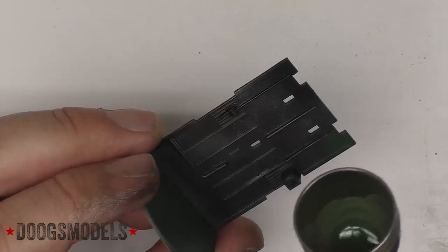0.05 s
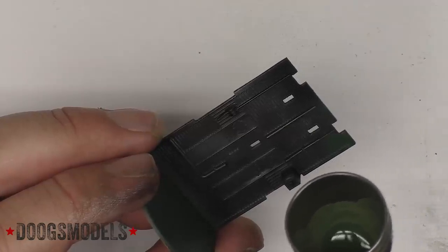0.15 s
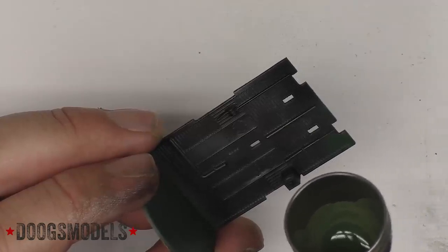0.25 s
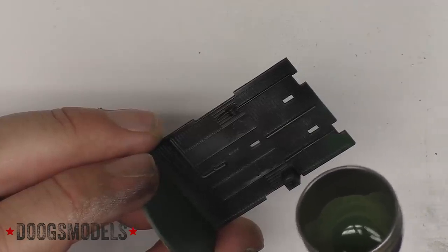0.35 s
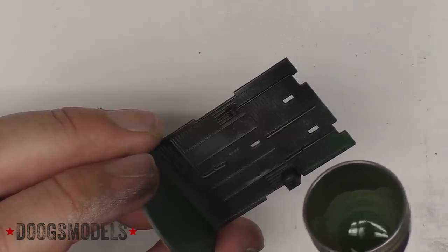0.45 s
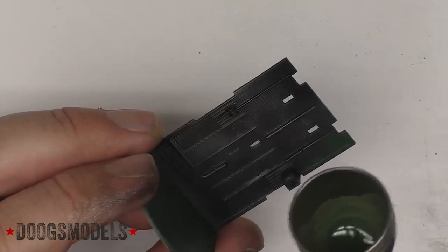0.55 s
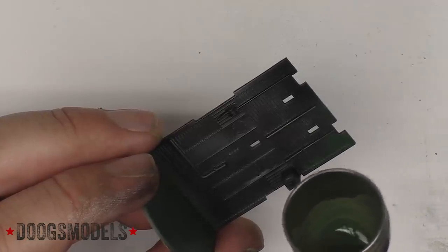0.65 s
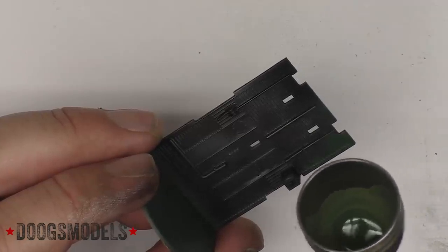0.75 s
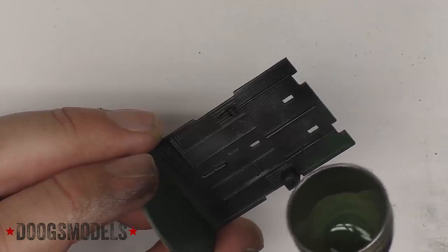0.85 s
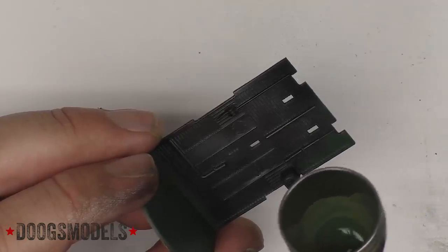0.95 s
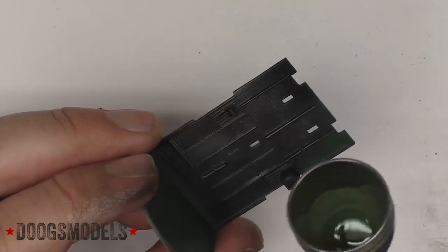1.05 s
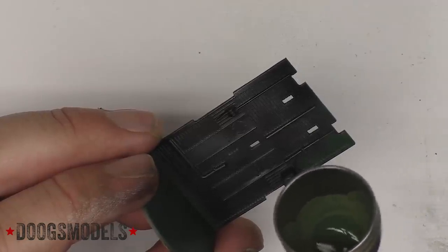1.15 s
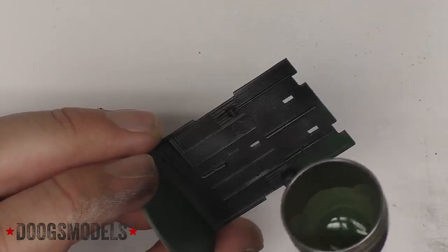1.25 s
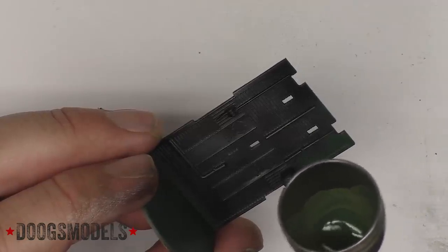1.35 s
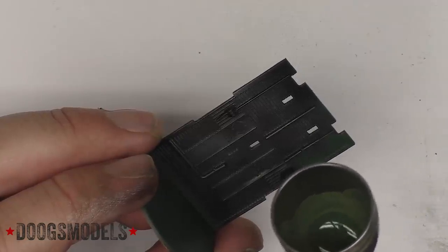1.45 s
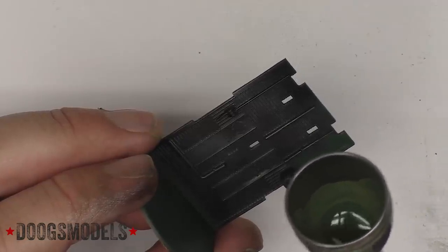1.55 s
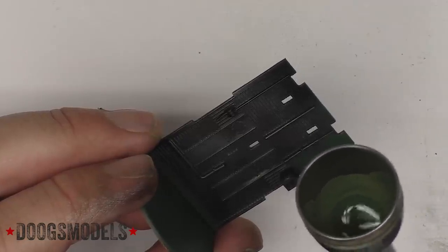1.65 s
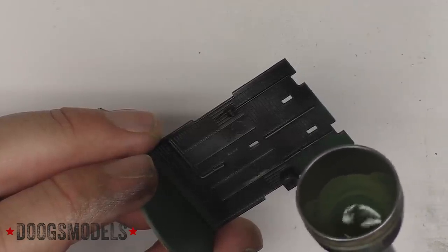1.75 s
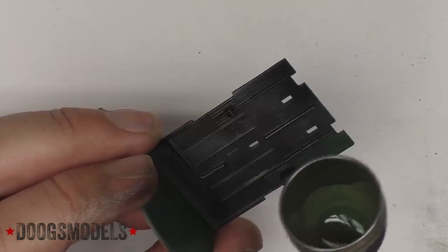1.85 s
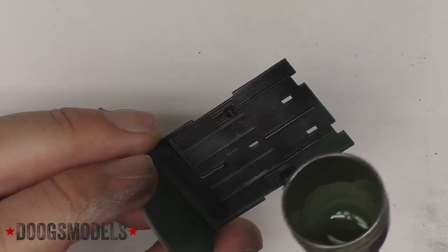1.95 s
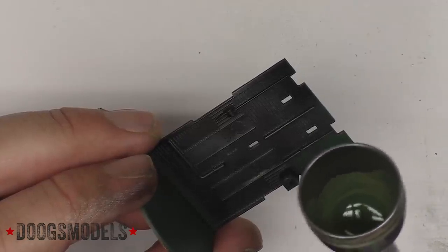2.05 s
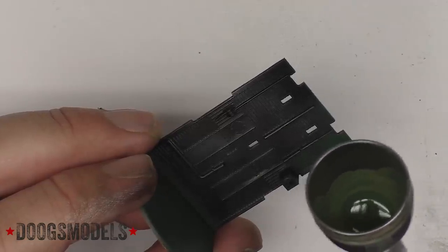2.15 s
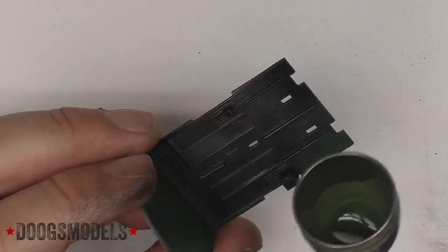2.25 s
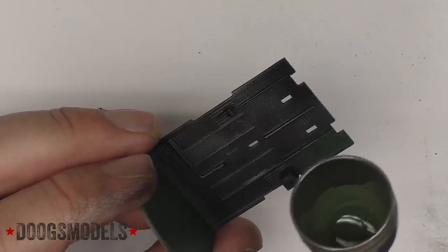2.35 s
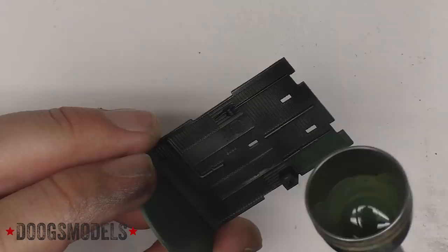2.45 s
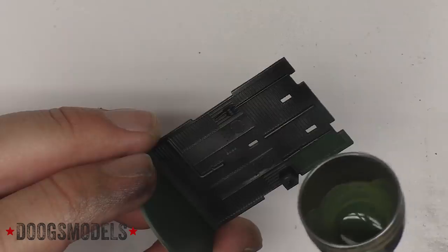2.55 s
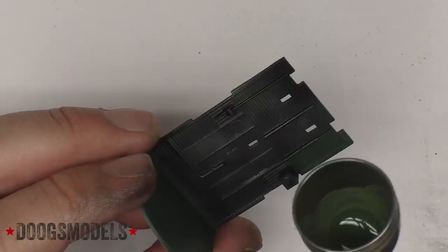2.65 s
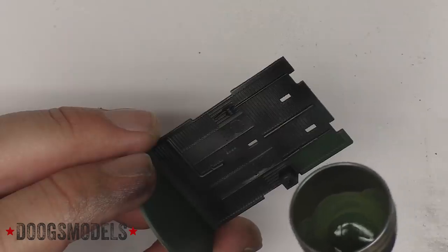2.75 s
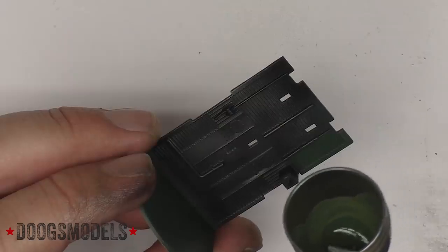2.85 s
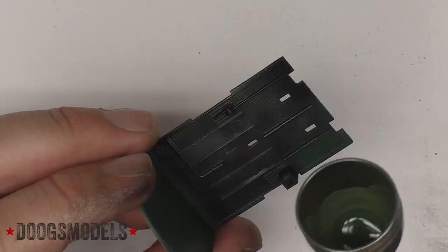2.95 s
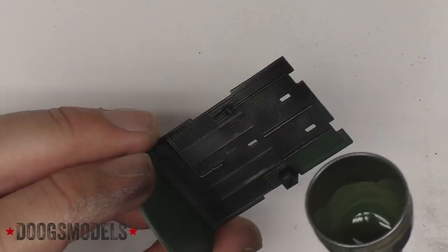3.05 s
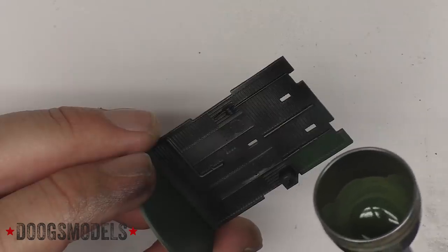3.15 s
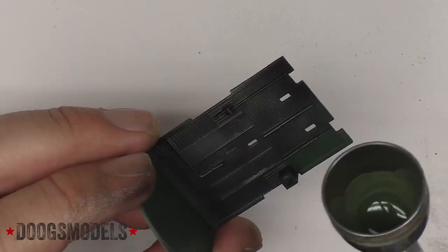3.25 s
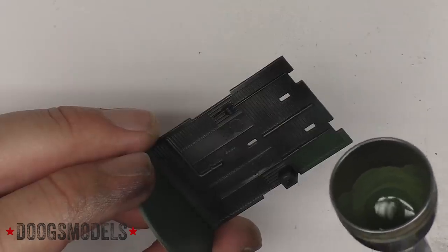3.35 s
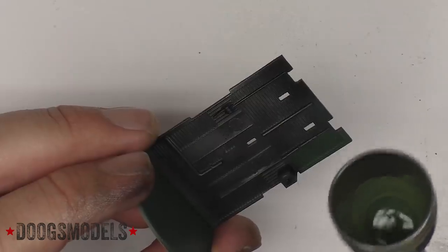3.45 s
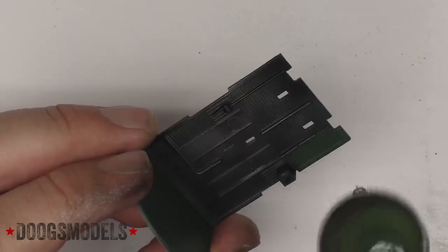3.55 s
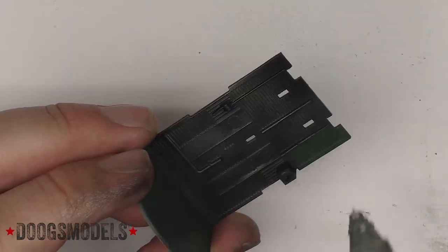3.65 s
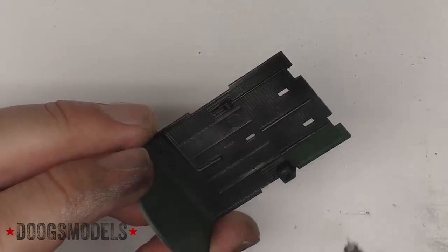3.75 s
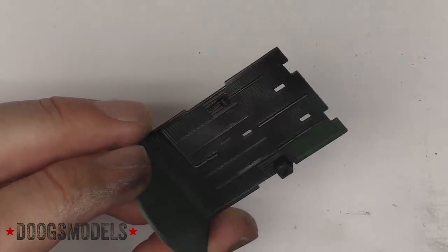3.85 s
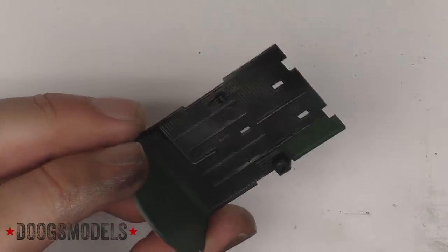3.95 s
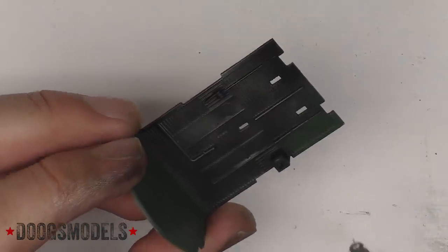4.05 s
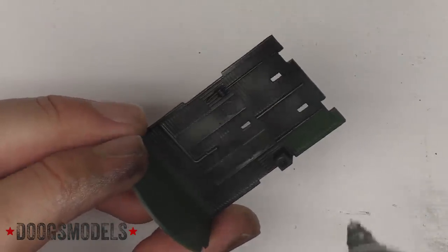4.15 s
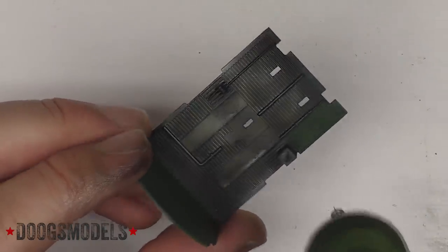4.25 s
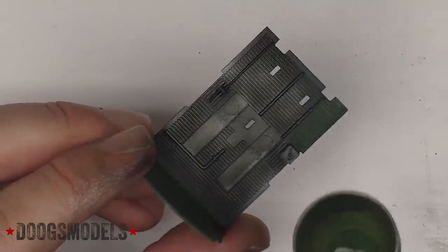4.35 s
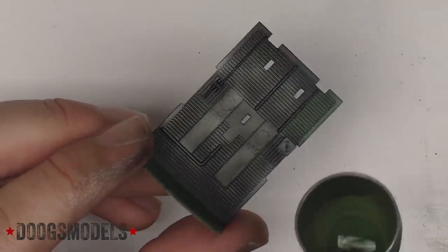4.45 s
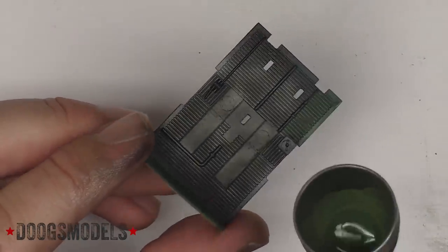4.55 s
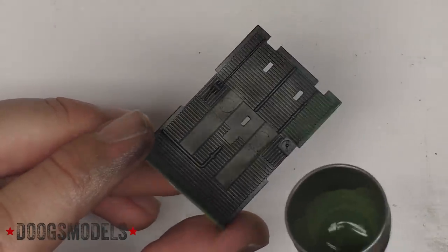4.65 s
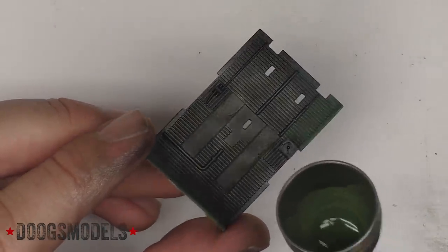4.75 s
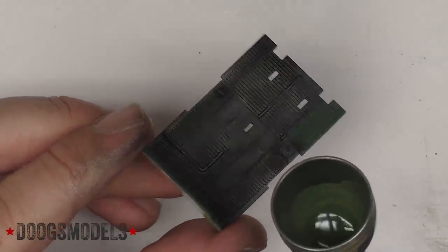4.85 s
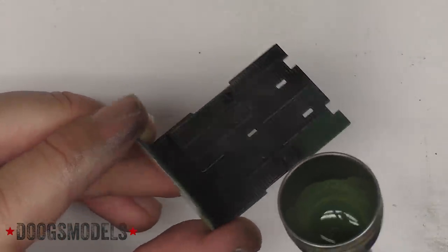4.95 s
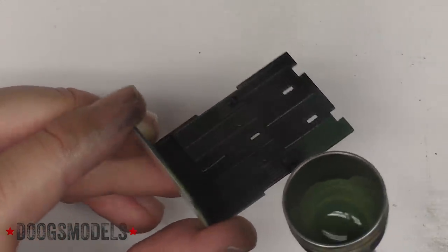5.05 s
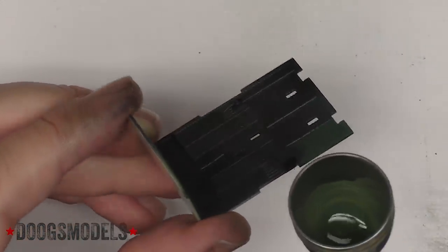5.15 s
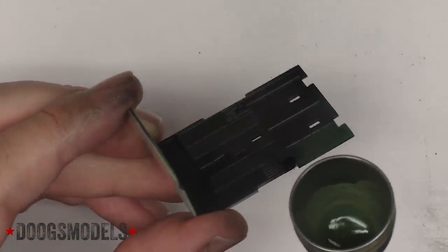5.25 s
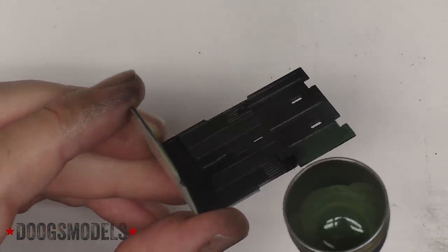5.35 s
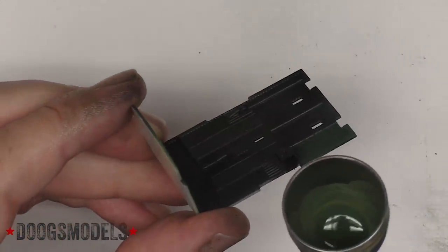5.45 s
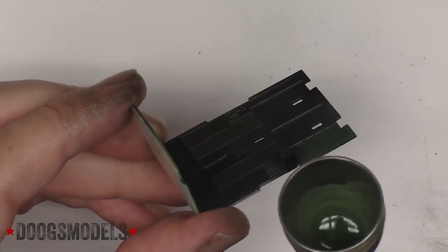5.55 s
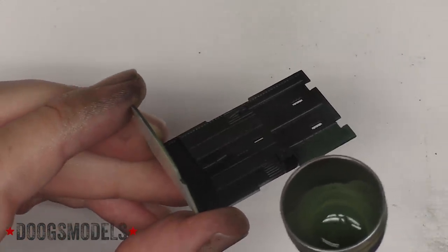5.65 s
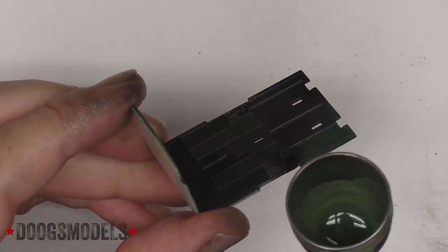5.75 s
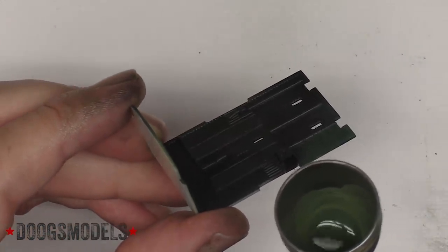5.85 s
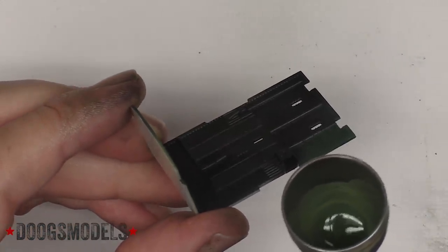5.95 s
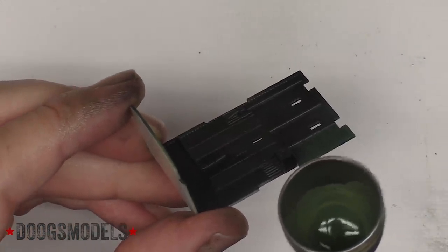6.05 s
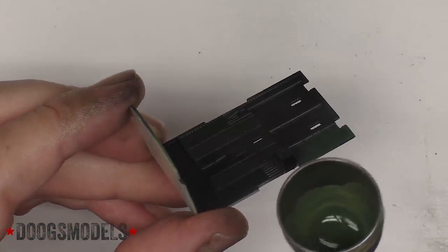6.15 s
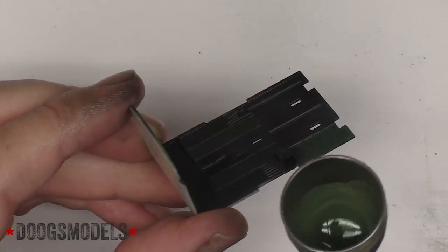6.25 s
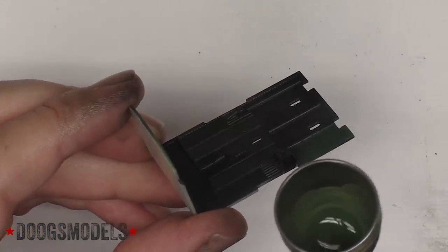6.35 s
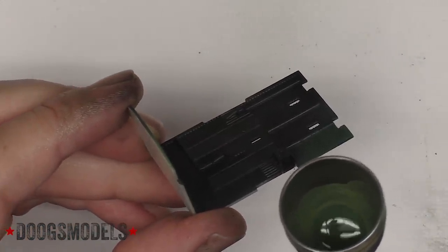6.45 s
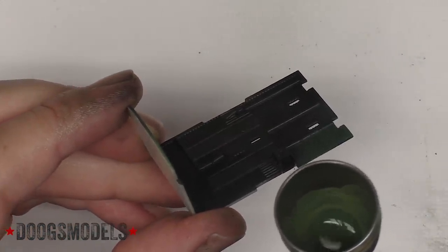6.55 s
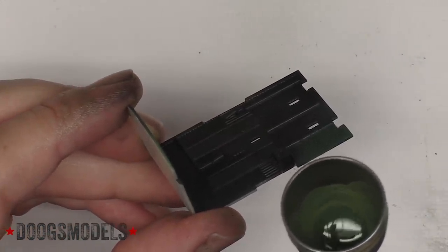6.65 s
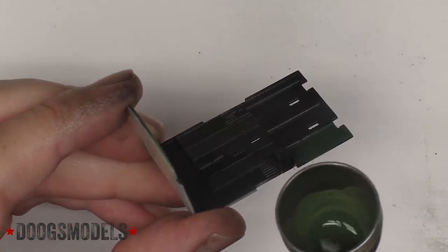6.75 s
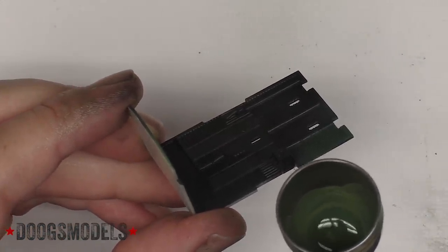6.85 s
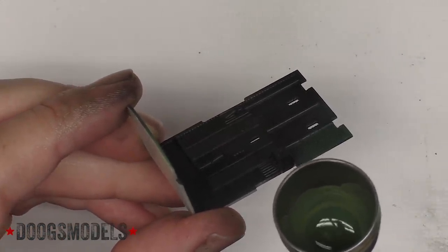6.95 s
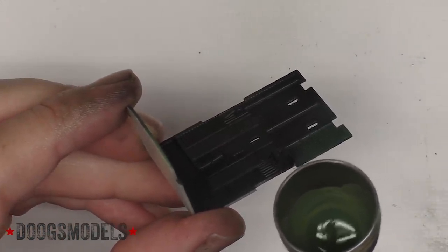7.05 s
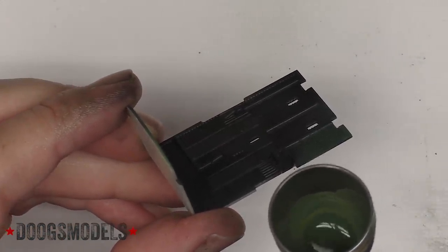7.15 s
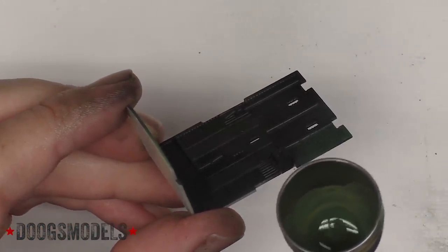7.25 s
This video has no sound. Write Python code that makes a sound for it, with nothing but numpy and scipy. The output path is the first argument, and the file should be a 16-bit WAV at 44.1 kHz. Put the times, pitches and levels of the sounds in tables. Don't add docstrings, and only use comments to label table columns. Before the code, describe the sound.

Close bright spray hiss, long then a tiny puff then long again, over a faint pump hum that briefly buzzes between strokes.

```python
import sys
import numpy as np
from scipy import signal
from scipy.fft import rfft, irfft, next_fast_len
from scipy.io import wavfile
from scipy.ndimage import uniform_filter1d, map_coordinates

SR = 44100
rng = np.random.default_rng(int(sys.argv[2]) if len(sys.argv) > 2 else 0)


def gain_from_decibels(decibels):
    exponent = np.asarray(decibels, float) / 20
    return 10 ** exponent


def unload_audio(sound):
    columns = np.transpose(np.atleast_2d(sound))
    steps = np.round(np.clip(columns, -1, 1) * 32767)
    wavfile.write(sys.argv[1], SR, steps.astype(np.int16))


N = 322371

# [opens/s, rise/s, shuts/s, fall t60/s, seep level/dB, seep t60/s]
TRIGGER = [
    (-1, .01, 3.528, .075, -22, 2.6),
    (4.654, .03, 4.82, .045, -18, .4),
    (5.582, .034, 9, .1, -30, 1),
]
FREE_DB = [-41.1, -37.2, -35.4]
# [f/Hz, density/dB per Hz]
JET_FLAT = [(350, -14.9), (1000, -16.3), (1900, -2.2), (2700, -10.6), (5400, -15.3), (9000, -11.7),
            (13000, -10.6), (15700, -19.4)]
# [f/Hz, density/dB per Hz]
JET_TURNING = [(350, -14.5), (1000, -6.6), (1900, 0.7), (2700, 1.6), (5400, -13.7), (9000, -13.6),
               (13000, -14.3), (15700, -17.4)]
# [f/Hz, density/dB per Hz]
JET_TILTED = [(350, -15.1), (1000, -19.2), (1900, -5.2), (2700, -12.1), (5400, -20.8), (9000, -10.2),
              (13000, -8.6), (15700, -19.7)]
# [f/Hz, width/Hz, level/dB]
HELD_FLAT = [(610.0, 190.0, -7.7), (990.0, 160.0, 7.7), (1350.0, 420.0, 5.6), (2130.0, 120.0, 4.6),
             (2390.0, 130.0, 6.7), (2590.0, 90.0, -5.5), (2840.0, 150.0, 14.0), (2860.0, 170.0, -13.5),
             (3600.0, 120.0, -4.1), (3890.0, 160.0, 8.3), (4300.0, 450, 8), (5120.0, 70.0, -5.9),
             (5640.0, 130.0, -4.0), (12270.0, 420.0, -3.7)]
# [f/Hz, width/Hz, level/dB]
HELD_TURNING = [(630.0, 350.0, -11.5), (2630.0, 220.0, -5.1), (3410.0, 900.0, -12.2), (4440.0, 880.0, 5.7),
                (7540.0, 700.0, -11.6), (7620.0, 420.0, 14.0), (8330.0, 260.0, 3.9), (11140.0, 900.0, 5.0),
                (15150.0, 190.0, -5.1)]
# [f/Hz, width/Hz, level/dB]
HELD_TILTED = [(710.0, 450.0, -14.0), (1940.0, 240.0, -7.0), (2380.0, 120.0, 5.6), (3030.0, 80.0, 5.2),
               (3920.0, 320.0, 9.8), (4380.0, 240, 15.5), (5100.0, 770.0, 14.0), (5120.0, 130.0, -10.2),
               (6480.0, 900.0, 7.4), (6920.0, 100.0, 7.4), (8350.0, 120.0, 6.1), (9390.0, 160.0, 5.2),
               (12280.0, 140.0, -6.5), (12860.0, 320.0, -6.8)]
# [t/s, length/s, flat level/dB, ridge level/dB]
CROSSINGS = [(-0.1, 0.26, 6.6, 1.8), (0.16, 0.22, 7.5, 0.4), (0.38, 0.14, 5.5, -0.8),
             (0.52, 0.09, 1.3, -1.6), (0.61, 0.18, 3.2, -1.5), (0.95, 0.08, 1.3, 0.2),
             (1.5, 0.18, 0.4, 1.5), (1.68, 0.21, 1.2, 8.1), (1.89, 0.21, 0.6, 2.0), (2.1, 0.13, 1.5, 7.8),
             (2.23, 0.1, 1.8, 3.5), (2.77, 0.1, 4.4, -0.6), (2.87, 0.13, 6.9, -0.2), (3, 0.15, 4.5, 1.1),
             (3.15, 0.2, 1.2, 3.1), (3.35, 0.2, -1.5, 5.7), (4.795, 0.05, -1.6, 4.3), (5.6, 0.17, 0.4, 0.4),
             (5.88, 0.08, 0.3, 1.5), (6.07, 0.04, -1.2, -2.2), (6.2, 0.25, 1, 0.8), (6.7, 0.08, 0.7, 2.0),
             (6.81, 0.09, 2.1, 1.5), (6.97, 0.07, -0.6, 1.2), (7.17, 0.11, 4.4, 2.4)]
# [t/s, level/dB]
NEEDLE = [(0, 2.8), (0.1, 2.4), (0.55, -0.0), (3.41, 0.0), (3.48, -4.3), (5.62, 0.2), (5.86, -3.8),
          (6.35, -2.3), (6.5, 1.0), (6.57, 3.1), (6.96, 3.3), (7.05, -1.4), (7.13, -0.6), (7.31, 1.6)]
# [f/Hz, share]
FLAT_SHARE = [(500, 0.26), (1800, 1.21), (2900, 1.14), (5500, 0.87), (6400, 0.24), (7800, 0.71),
              (9200, 0.24), (15700, -0.01)]
# [f/Hz, share]
RIDGE_SHARE = [(600, -0.01), (2400, 0.34), (3700, 1.25), (5200, 0.66), (6000, 1.26), (8000, 0.42),
               (9300, 0.75), (11000, 0.23)]
# [f/Hz, share]
PAINT_SHARE = [(1500, 0.0), (3500, 0.18), (7500, 0.6), (9000, 0.96), (12400, 1.14), (13000, 0.5),
               (14400, 1.68), (15700, 0.66)]
# [f/Hz, level/dB]
GLINT = [(3000, -40), (6000, -16), (9000, -9), (13000, -6), (16000, -5)]
# [f/Hz, level/dB]
SPREAD = [(600, -6), (1300, -20), (2000, -21), (2800, -12), (4500, -14), (7000, -23), (10800, -14),
          (15000, -10)]
# [f/Hz, t60/s]
BENCH = [(500, .4), (1200, .45), (3000, .55), (5000, .7), (12000, .4)]
# [t/s, level/dB]
LOAD = [(0, .5), (.6, -1.5), (1.7, -2), (2.9, .5), (3.52, -2), (3.62, -12), (4.13, -14), (4.2, -10),
        (4.4, -9), (4.5, -3.5), (4.75, 2), (5.3, .3), (5.5, -6), (5.58, -10), (5.68, 0), (7.31, 2)]
# [f/Hz, density/dB per Hz]
RUMBLE = [(20, -13), (108, 1), (160, -5), (230, -3), (430, -8), (560, -21), (900, -34), (1400, -70)]
# [f/Hz, width/Hz, level/dB]
HOUSING = [(1930, 95, 0), (2125, 110, -6)]
# [t/s, rise/s, level/dB]
BUZZ = (4.14, .02, -67.5)
# [f/Hz, level/dB]
WHINE = (689, -85)
# [f/Hz, density/dB per Hz]
INTAKE = [(600, -60), (1300, -24), (2150, 1), (2600, -11), (3750, -12), (4300, -19), (8000, -32),
          (15000, -36)]
# [f/Hz, density/dB per Hz]
COVER = [(400, -50), (600, -22), (850, -11), (1050, 0), (1250, -5), (1700, -6), (2200, -20), (3500, -60)]
# [f/Hz, density/dB per Hz]
AIR = [(20, -20), (60, -8), (110, -3), (200, -5), (300, -6), (420, -12), (560, -28), (900, -60)]
# [f/Hz, density/dB per Hz]
FLOOR = [(400, -20), (700, -13), (1100, -5), (2500, -7), (3800, -10), (5000, -17), (7000, -20.5),
         (9500, -14)]
# [t/s, length/s, start f/Hz, end f/Hz, level/dB]
SQUEAKS = [
    (3.905, .04, 1500, 1480, -68),
    (5.236, .04, 3760, 3750, -63),
    (5.27, .045, 3750, 3720, -60),
    (5.27, .024, 1060, 1050, -57),
]
# [t/s, level/dB, t60/s]
POP = (4.6605, -27, .045)

SWEEP_S = .05
JET_LOW_HZ = 520
SHAFT_HZ, REFILL_ENDS_S = 59.06, 5.6
HUM_DB, INTAKE_DB, COVER_DB = -63, -63, -65.5
HUM_GROWS, INTAKE_GROWS, COVER_GROWS = .9, .9, 1.3
AIR_DB, FLOOR_DB = -66.3, -66.7
TOP_HZ = 15730


def along(points, hz):
    f, v = np.transpose(points)
    return np.interp(np.log(hz + 1), np.log(f + 1), v)


def unit(x):
    return x / np.sqrt(np.mean(x ** 2) + 1e-20)


def wobble(rate_hz):
    knots = rng.standard_normal(int(N * rate_hz / SR) + 4)
    return map_coordinates(knots, [np.arange(N) * rate_hz / SR])


def filtered(x, response):
    n = x.shape[-1]
    m = next_fast_len(n + 4096, True)
    return irfft(rfft(x, m) * response(np.fft.rfftfreq(m, 1 / SR)), m)[..., :n]


def resonance(modes, f):
    total = 0
    for k, (centre, width, db) in enumerate(modes):
        damping = 1j * f * width
        total = total + (-1) ** k * gain_from_decibels(db) * damping / (centre ** 2 - f ** 2 + damping)
    return total


def patchy(size, patchy_db):
    z = signal.stft(rng.standard_normal(size), nperseg=512)[2]
    field = uniform_filter1d(rng.standard_normal(z.shape), 5, 0)
    field = uniform_filter1d(field, 12, 1)
    return signal.istft(z * gain_from_decibels(patchy_db * unit(field)), nperseg=512)[1][:size]


def pair(spectrum, side_db):
    mid, side = filtered(rng.standard_normal((2, N)), lambda hz: gain_from_decibels(along(spectrum, hz)))
    side = gain_from_decibels(side_db) * side
    return np.array([mid + side, mid - side]) / np.std(mid)


def valve(opens, rise, shuts, fall, seep_db, seep):
    t = np.arange(N) / SR
    after = np.maximum(t - shuts, 0)
    emptying = gain_from_decibels(-60 * after / fall)
    seeping = gain_from_decibels(seep_db - 60 * after / seep)
    return np.clip((t - opens) / rise, 0, 1) ** 2 * np.maximum(emptying, seeping)


def aimed(x):
    hz, t, z = signal.stft(x, SR, nperseg=256)

    def slide(s):
        return np.clip((t - s) / SWEEP_S + .5, 0, 1)

    flat_db, ridge_db = np.zeros(len(t)), np.zeros(len(t))
    for s, length, flat, ridge in CROSSINGS:
        on_part = slide(s) - slide(s + length)
        flat_db += flat * on_part
        ridge_db += ridge * on_part
    paint_db = np.interp(t, *np.transpose(NEEDLE))
    change_db = np.outer(along(FLAT_SHARE, hz), flat_db)
    change_db += np.outer(along(RIDGE_SHARE, hz), ridge_db)
    change_db += np.outer(along(PAINT_SHARE, hz), paint_db)
    return signal.istft(z * gain_from_decibels(change_db), SR, nperseg=256)[1][:N]


def spray():
    out = np.zeros(N)
    colours = [JET_FLAT, JET_TURNING, JET_TILTED]
    held = [HELD_FLAT, HELD_TURNING, HELD_TILTED]
    for free_db, trigger, colour, cavities in zip(FREE_DB, TRIGGER, colours, held):
        start = max(0, round(trigger[0] * SR))
        stop = min(N, round(trigger[2] * SR) + SR // 2)

        def shape(f):
            db = along(colour, f)
            for hz, width, peak_db in cavities:
                db = db + peak_db / (1 + (2 * (f - hz) / width) ** 2)
            return gain_from_decibels(db) / np.hypot(1, (JET_LOW_HZ / (f + 1)) ** 4)

        jet = filtered(patchy(stop - start, patchy_db=.9), shape)
        out[start:stop] += gain_from_decibels(free_db) * unit(jet) * valve(*trigger)[start:stop]
    flutter_db = .5 * wobble(14) + .6 * wobble(90)
    return aimed(out) * gain_from_decibels(flutter_db)


def hands(x):
    t = np.arange(SR // 20) / SR
    glints = rng.standard_normal((2, len(t))) * gain_from_decibels(-60 * t / .06) * np.clip(t / .002, 0, 1)
    both = signal.oaconvolve(x[None], glints / np.linalg.norm(glints[0]), axes=1)[:, :N]
    mid, side = filtered(both, lambda f: gain_from_decibels(np.array([along(GLINT, f), along(SPREAD, f)])))
    return np.array([mid + side, mid - side])


def bench(x):
    hz, t, z = signal.stft(rng.standard_normal((2, SR // 2)), SR, nperseg=256)
    decay = gain_from_decibels(-60 * t / along(BENCH, hz)[:, None])
    tail = signal.istft(z * decay, SR, nperseg=256)[1]
    tail[1] = .7 * tail[0] + .7 * tail[1]
    return signal.fftconvolve(x[None], tail / np.linalg.norm(tail[0]), axes=1)[:, :N]


def compressor():
    t = np.arange(N) / SR
    load_db = np.interp(t, *np.transpose(LOAD))
    lines = gain_from_decibels(-16) * np.sin(2 * np.pi * SHAFT_HZ * t)
    lines += gain_from_decibels(-10 + 2 * wobble(6)) * np.sin(4 * np.pi * SHAFT_HZ * t)
    hum = gain_from_decibels(HUM_DB + HUM_GROWS * load_db) * (pair(RUMBLE, side_db=-2.5) + lines)
    hum = hum * gain_from_decibels([[-.7], [.7]])

    starts, rise, buzz_db = BUZZ
    refill = np.clip((t - starts) / rise, 0, 1) * (t < REFILL_ENDS_S)
    taps = np.diff(np.floor(SHAFT_HZ * t), prepend=0) * gain_from_decibels(1.8 * wobble(40))
    taps = unit(taps) + .65 * rng.standard_normal(N)
    buzz = unit(filtered(taps, lambda f: resonance(HOUSING, f) ** 2))
    buzz = gain_from_decibels(buzz_db) * refill * buzz
    whine_hz, whine_db = WHINE
    whine = gain_from_decibels(whine_db) * refill * np.sin(2 * np.pi * whine_hz * t + 1.9 * wobble(10))

    intake = refill * gain_from_decibels(INTAKE_DB + INTAKE_GROWS * load_db) * pair(INTAKE, side_db=-14)
    cover_db = COVER_DB + COVER_GROWS * load_db + 1.5 * wobble(25)
    cover = refill * gain_from_decibels(cover_db) * pair(COVER, side_db=-12)
    return hum + buzz + whine + intake + cover


def room():
    return gain_from_decibels(AIR_DB) * pair(AIR, side_db=-1.5) + gain_from_decibels(FLOOR_DB) * pair(FLOOR, side_db=-2.5)


def squeaks():
    t, out = np.arange(N) / SR, np.zeros(N)
    for s, length, from_hz, to_hz, db in SQUEAKS:
        u = np.clip((t - s) / length, 0, 1)
        phase = 2 * np.pi * np.cumsum(from_hz + (to_hz - from_hz) * u) / SR
        out += gain_from_decibels(db + 1.2 * wobble(45)) * np.sin(np.pi * u) * np.sin(phase)
    return out


def pop():
    s, db, t60 = POP
    u = np.maximum(np.arange(N) / SR - s, 0)

    def bright(f):
        low_cut = f ** 2 / (f ** 2 + 1200 ** 2)
        return low_cut / np.hypot(1, f / 4500) / np.hypot(1, (f / 12000) ** 5)

    puff = unit(filtered(rng.standard_normal(N), bright))
    return gain_from_decibels(db - 60 * u / t60) * (1 - np.exp(-u / .0012)) * puff


def scene():
    jet = spray() + pop()
    near = gain_from_decibels(-1.1) * (jet * gain_from_decibels([[.3], [-.3]]) + hands(jet))
    return near + gain_from_decibels(-20) * bench(jet) + compressor() + squeaks() + room()


def top_cut(x):
    return signal.sosfilt(signal.butter(12, 16200, fs=SR, output="sos"), x)


def record(dry):
    mix = filtered(dry, lambda hz: hz < TOP_HZ)
    return top_cut(mix)


dry = scene()
out = record(dry)
unload_audio(out)
```